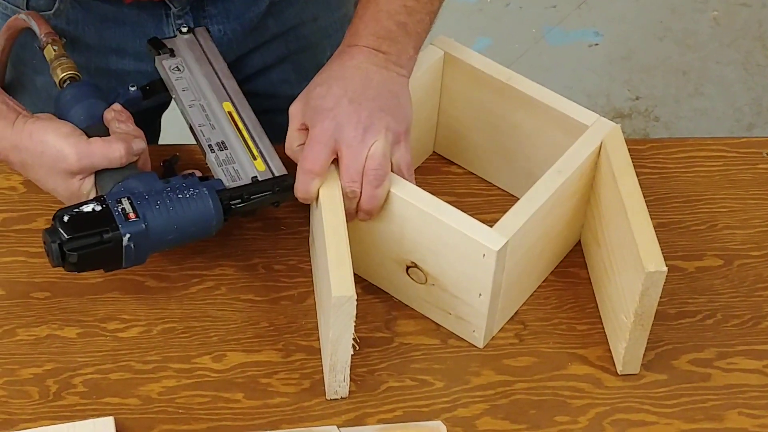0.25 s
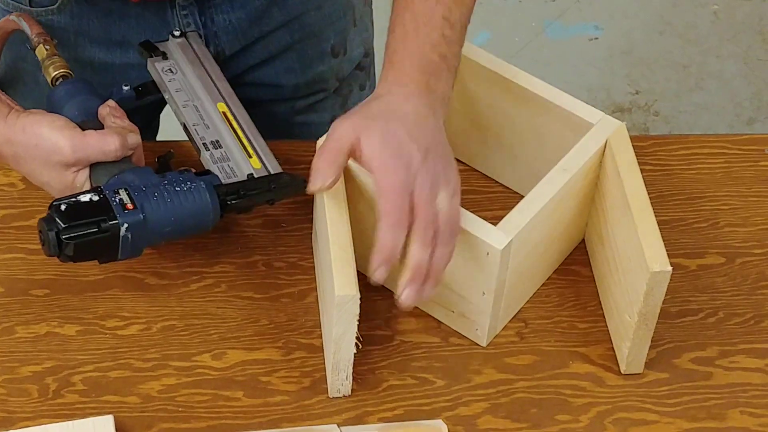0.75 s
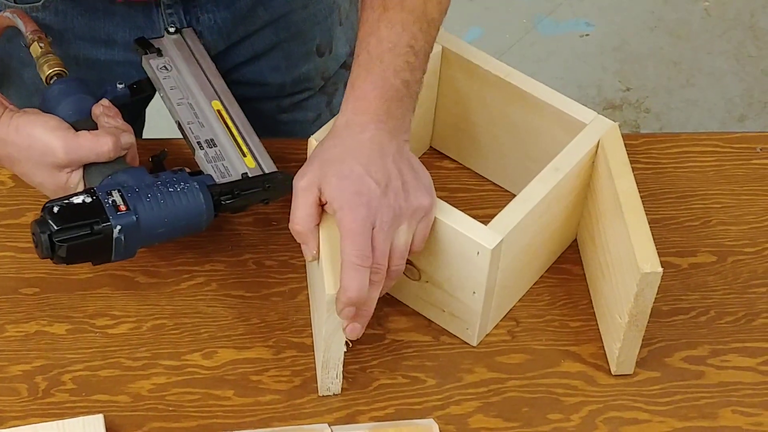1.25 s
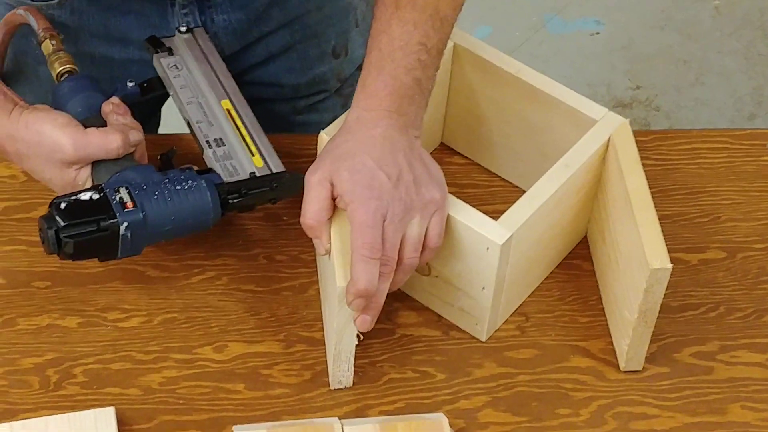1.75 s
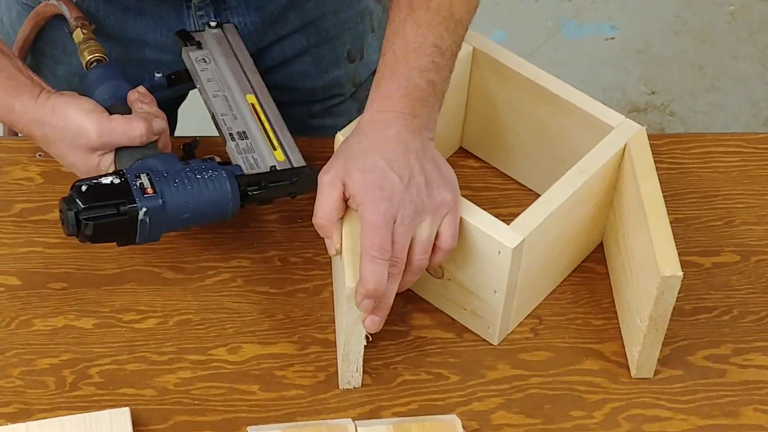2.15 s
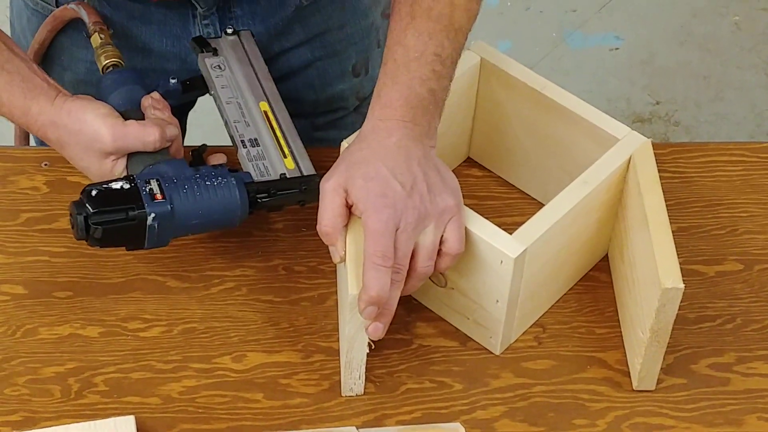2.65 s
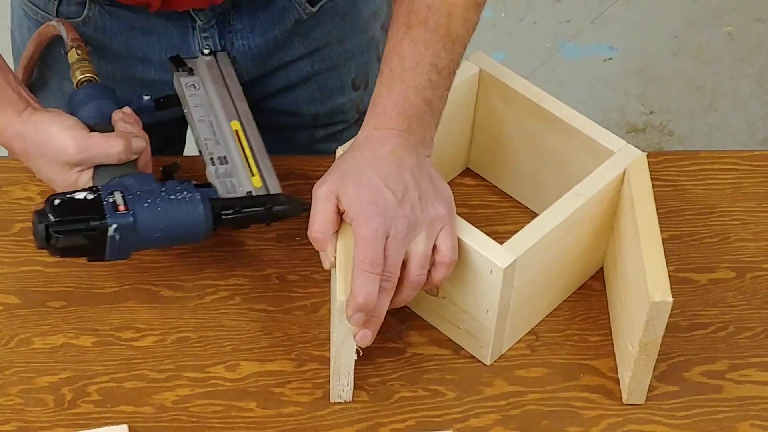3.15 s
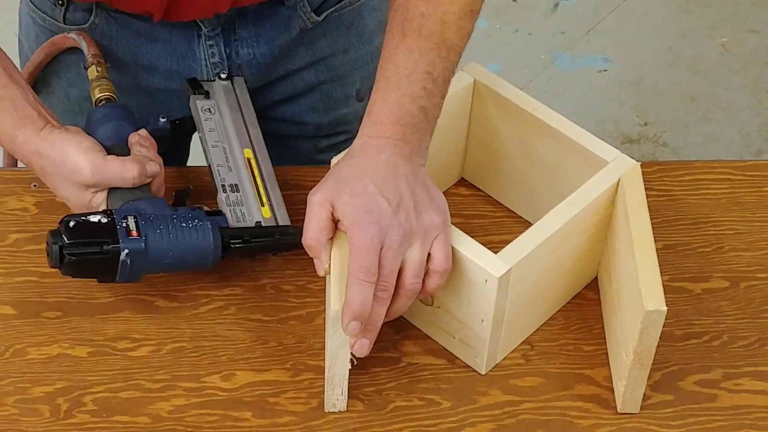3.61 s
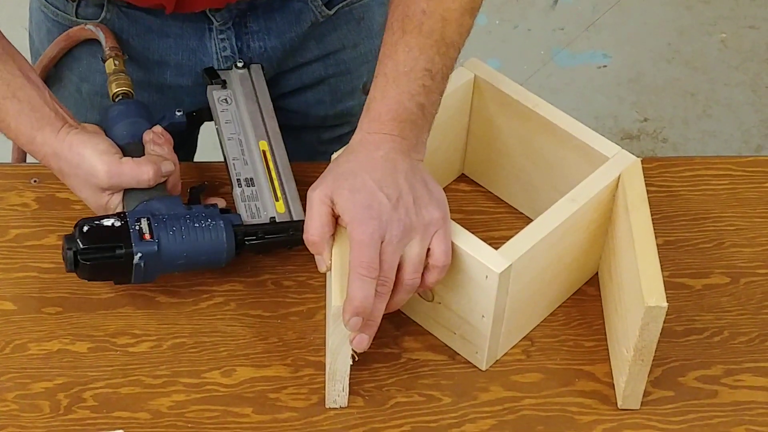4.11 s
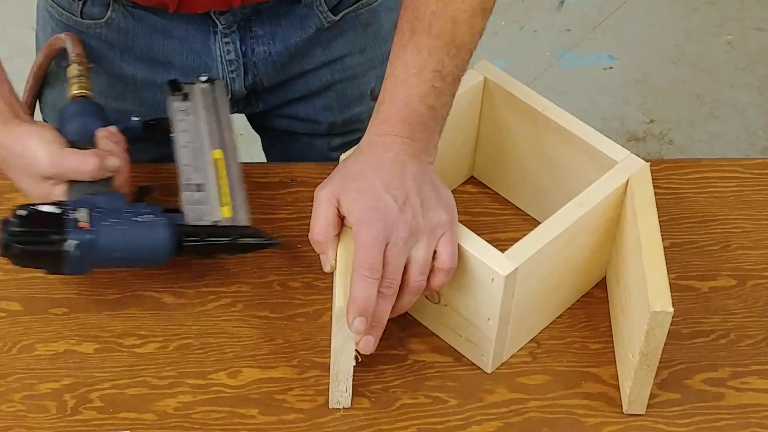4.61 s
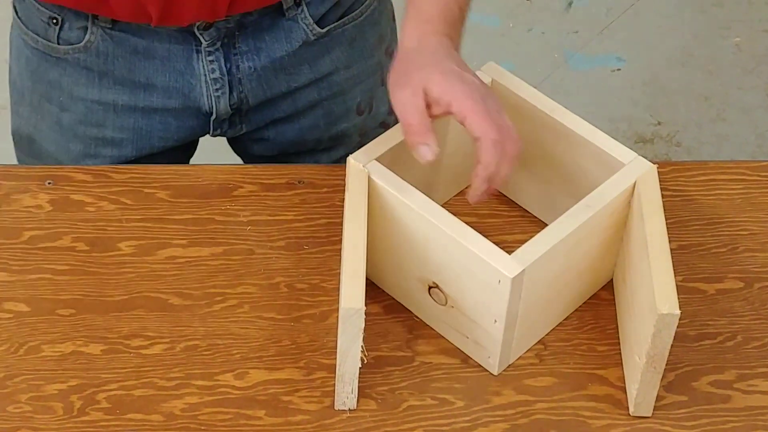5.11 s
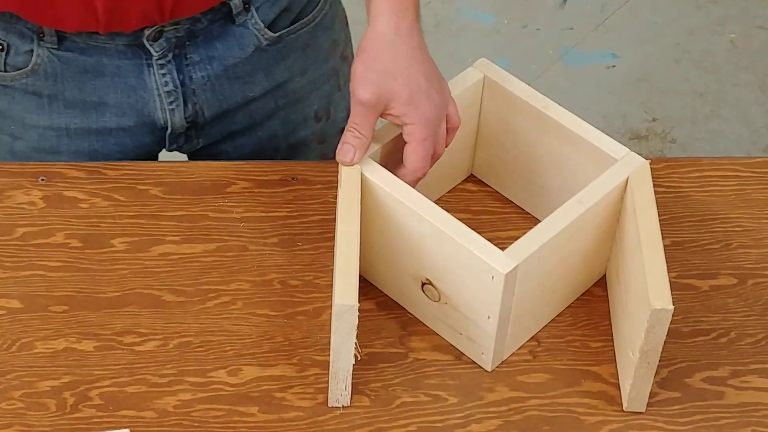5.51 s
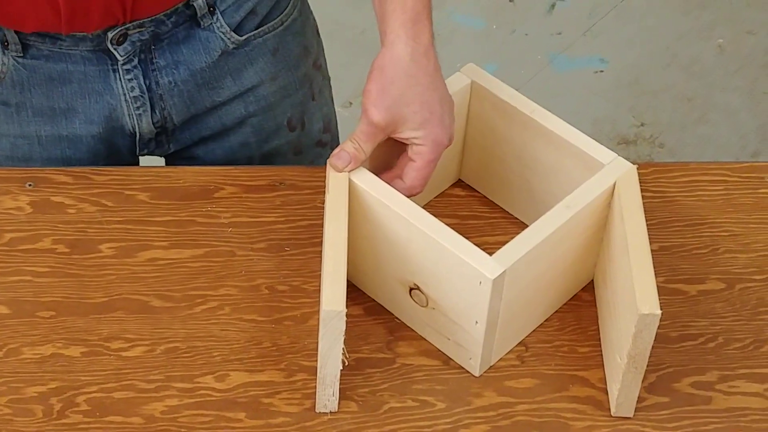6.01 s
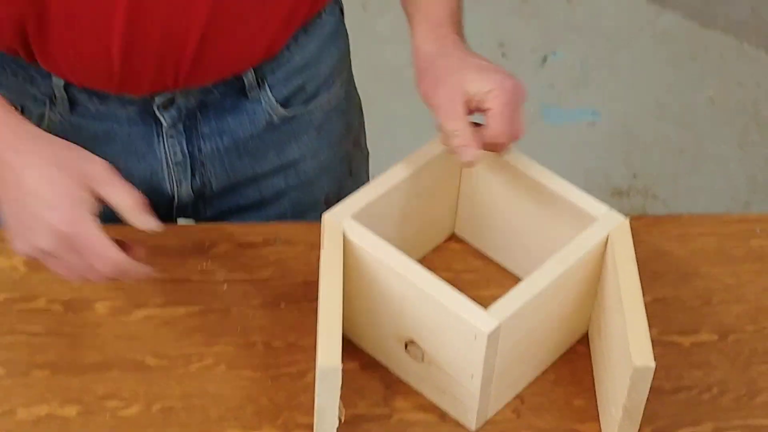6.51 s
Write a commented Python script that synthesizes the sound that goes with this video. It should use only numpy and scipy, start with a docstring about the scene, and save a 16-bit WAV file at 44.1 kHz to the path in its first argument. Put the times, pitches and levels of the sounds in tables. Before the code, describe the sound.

Close at a workbench in a reverberant workshop with a low rumble, fingers scuff and click on a small wooden box, with a few soft bumps. An air stapler fires two very loud, sharp double cracks about a second and a half apart, each with a bright spit of exhaust. Then the hand rubs the wood, hollow knocks sound as the box is tipped, and a sleeve swishes softly.

```python
"""A pneumatic stapler fires twice into a wooden box on a workbench, in a live workshop.
Each shot is gated noise for the air and decaying modes for the driver's blow, the piston's stop and its return.
Hands shift their grip in noise scuffs and clicks; knocks on the box ring its modes, and at last it is tipped.
A sleeve swishes past as swelling noise, over a low rumble; echoes and a decaying noise tail form the room.
A fast limiter squashes the peaks."""
import sys
import numpy as np
from scipy import signal
from scipy.fft import rfft, irfft, next_fast_len
from scipy.io import wavfile
from scipy.ndimage import uniform_filter1d, minimum_filter1d, map_coordinates

SR = 44100
rng = np.random.default_rng(int(sys.argv[2]) if len(sys.argv) > 2 else 0)


def persist_wave(psi):
    """Save psi, clipped to +-1, as 16-bit WAV."""
    counts = np.round(np.clip(psi, -1, 1) * 32767).astype(np.int16)
    wavfile.write(sys.argv[1], SR, np.atleast_2d(counts).T)


N = 298116

# Spectrum of the steady rumble: pitch_hz, relative_db
RUMBLE_SPECTRUM = [(20, -32.5), (45, -49), (62, -0.5), (82, 9), (105, 4.5), (170, -4.5), (300, -13),
                   (700, -28), (1500, -48)]
# Spectrum of the workshop's faint air noise: pitch_hz, relative_db
AIR_SPECTRUM = [(120, 0), (250, -6), (500, -15), (1000, -21), (2000, -25), (4200, -26), (6500, -33),
                (10000, -42), (16000, -44)]
# Decay of the room's tail: pitch_hz, t60_s
ROOM_DECAY = [(70, 0.27), (200, 0.48), (600, 0.75), (2000, 0.61), (5000, 0.46), (8500, 0.51), (12000, 0.44),
              (16000, 0.53)]
# Echoes of the walls: delay_s, relative_db
WALL_ECHOES = [(0.046, -13.5), (0.062, -10), (.084, -14)]
# An arm sweeps past the clothes: fastest_s, level_db, half_length_s (to 1/e)
SWISHES = [(6.205, -56.5, 0.092), (6.399, -36.5, 0.055)]
# Spectrum of the swishing cloth: pitch_hz, relative_db
CLOTH_SPECTRUM = [(300, -30), (1100, -18), (1500, -3), (2300, -3.5), (3600, 2.5), (6500, -4.5), (8800, -14),
                  (10400, -36), (12500, -17), (15500, -29)]
# Hands and clothes rub, one curve per stroke: time_s, relative_db
RUB_STROKES = [
    [(0.0, -59), (0.382, -62.5), (0.594, -50.5), (0.73, -69), (0.8, -92)],
    [(4.95, -50.5), (5.378, -75.5), (5.464, -57), (5.772, -64), (5.86, -61.5)],
]
# Spectrum of skin rubbing wood: pitch_hz, relative_db
SKIN_SPECTRUM = [(150, 2.5), (500, -3.5), (900, -0.5), (1700, 6), (2500, 5.5), (4200, 3), (6500, -7.5),
                 (8500, -4.5), (10400, -27), (12500, -4), (16000, -22)]
# Longer scuffs of fingers and of the tool's nose on wood: start_s, relative_db, length_s, pitch_hz
SCUFFS = [(0.411, -48, 0.094, 6800), (0.489, -54, 0.055, 1770), (1.063, -57, 0.091, 1890),
          (1.271, -54.5, 0.038, 1340), (1.639, -56, 0.053, 6200), (2.263, -44, 0.056, 3310),
          (3.788, -45, 0.036, 1635), (3.957, -50, 0.08, 1862), (5.161, -43.5, 0.26, 1640),
          (5.672, -45, 0.1, 2810)]
# The time in which the grip keeps shifting: start_s, end_s
GRIP = (.1, 2.3)
# Light clicks of fingers, nose piece and trigger: start_s, relative_db, pitch_hz
CLICKS = [(0.167, -35.5, 1080), (0.203, -34.5, 2100), (0.318, -45, 4170), (0.578, -32, 2410),
          (0.597, -24.5, 6060), (0.626, -22.5, 2700), (0.657, -19.5, 2680), (1.636, -34.5, 6040),
          (1.829, -43.5, 1120), (1.887, -47.5, 2040), (2.253, -40, 3450), (2.269, -35, 1122),
          (2.458, -46, 1088), (3.807, -27.5, 1077), (3.826, -38, 1680), (3.958, -37, 1680),
          (3.987, -30, 2240), (4.084, -31.5, 1057)]
# Wood meets wood or the tool's nose: start_s, relative_db, hardness_hz, tick_db
KNOCKS = [(0.038, -32.5, 1540, -34.5), (0.959, -20.5, 396, -47.5), (1.201, -24.5, 268, -51.5),
          (1.783, -42, 1490, -46.5), (2.286, -27, 800, -46), (2.457, -41.5, 1600, -53.5),
          (4.083, -31, 1920, -46), (5.164, -19, 2320, -36), (5.364, -10, 400, -27.5),
          (5.705, -27.5, 1250, -39.5), (5.905, -2, 860, -23.5)]
# Ringing modes of the box: pitch_hz, relative_db, t60_s
BOX_MODES = [(113, -11, .2), (160, -8, .12), (192, 2, .14), (215, -3, .1), (243, 2, .15), (305, -6, .1),
             (398, -3, .07), (465, -1, .1), (565, -9, .05), (725, -10, .04), (960, -8, .04),
             (1170, -10, .035), (1480, -8, .04), (2190, -13, .03)]
# Ringing modes of the bench under it: pitch_hz, relative_db, t60_s
BENCH_MODES = [(62, -3, .2), (81, 1, .2), (105, -8, .12)]
# Ringing modes of the stapler's body: pitch_hz, relative_db, t60_s
STEEL_MODES = [(1499, -10.5, 0.35), (1640, 4.5, 0.33), (2010, -1.5, 0.036), (2030, -4, 0.29),
               (2590, -6.5, 0.069), (3177, 3, 0.31), (4400, -10, 0.089), (4300, 14, 0.03), (4946, 4, .03),
               (6130, -2, 0.12), (7000, -28.5, .02)]
# Spectrum of the crack of steel on steel: pitch_hz, relative_db
CRACK_SPECTRUM = [(30, -35), (100, -19), (300, -8), (800, -19), (1500, 1.5), (2300, 3), (3200, 0),
                  (5400, 2.5), (6800, -8), (8200, -5), (10400, -21.5), (12500, -13), (15500, -13.5)]
# Spectrum of the spitting valve: pitch_hz, relative_db
SPIT_SPECTRUM = [(30, -39), (120, -18), (300, 2), (1000, -15), (3000, 2), (5000, -2.5), (6500, 4),
                 (8700, -0.5), (10400, -7), (12000, 1), (15500, 2.5)]
# Spectrum of the exhaust jet: pitch_hz, relative_db
JET_SPECTRUM = [(30, -39.5), (110, -11), (200, -1), (330, -5.5), (520, 7), (850, -0.5), (1900, 0),
                (3500, 5), (5200, 12), (7000, 5.5), (8500, 8.5), (10500, -1), (12000, 5.5), (15500, -2.5)]
# Shots: trigger_pulled_s, driver_stroke_s, trigger_held_s, spit_db, exhaust_db
SHOTS = [(2.866, .0157, .118, 3.5, 0), (4.3426, .0206, .0985, -7, 0.5)]

# background: the rumble, its drift, and the bench's shudder with each knock
RUMBLE_DB, RUMBLE_DRIFT_DB, WORKSHOP_DB = -50.5, 1.5, -61
SHUDDER_DB, SHUDDER_DB_PER_DB = -32.5, 0.4  # level under a 0 dB knock, and its change per dB of knock
SHUDDER_RISE_S, SHUDDER_S = 0.043, 0.076  # it builds as the box starts to move, then dies

# hands: rubbing offset, faint random scuffs, clicks, and the trigger just before the last shot
RUB_DB = 4.5
FIDGETS_PER_S, FIDGET_DB, FIDGET_S, FIDGET_HZ = 5, -62.5, 0.042, 1880  # central values of the random scuffs
CLICK_DB, CLICK_T60_S = -5.5, 0.041
TRIGGER_LEAD_S, TRIGGER_DB, TRIGGER_HZ = 0.028, -35, 7950

# knocks: the bench's thud, the soft contacts' jolt, and the box rocking back
THUD_DB, THUD_DB_PER_DB = -13, 0.67  # level under a 0 dB knock, and its change per dB of knock
JOLT_SOFT_HZ = 1310  # contacts softer than this shove the whole box
ROCK_S, ROCK_DB_PER_DB, ROCK_SHRINK = 0.052, 0.28, .55  # first gap at 0 dB, its growth, next gap over it
ROCK_LOSS_DB, ROCK_DULLS = 9, 0.37  # loss and hardness ratio per contact
TIP_S, TIP_DB = 5.825, -18  # the box is tipped over its edge and only the bench thuds

# every shot runs the same cycle: staple strike, bumper stop, valve release, exhaust, piston return
STRIKE_STEEL_DB, STRIKE_WOOD_DB = 6, 10.5
STOP_AFTER_S, STOP_STEEL_DB, STOP_WOOD_DB = .0045, 20, -9  # after the strike
RETURN_AFTER_S, RETURN_STEEL_DB, RETURN_WOOD_DB = .0325, 10.5, 14  # after the release
RELEASE_DB, RELEASE_S = 8.5, 0.036  # the valve spits as the trigger is let go
VENT_AFTER_S, VENT_HOLD_S, VENT_T60_S = .025, 0.075, 0.62  # after the release
FLUTTER_DB, FLUTTER_PER_S = 0.9, 90  # the exhaust jet is turbulent


def amp(db):
    """Amplitude gain is ten to the power of decibels over twenty."""
    return 10 ** (np.asarray(db) / 20)


def unit(x):
    """Division by the root mean square gives unit rms."""
    return x / np.sqrt(np.mean(x ** 2) + 1e-20)


def along(points, hz):
    """Interpolation on a log frequency axis joins (pitch_hz, value) points."""
    f, v = np.transpose(points)
    return np.interp(np.log(hz + 1), np.log(f + 1), v)


def clock():
    """Sampling divides one second into equal time steps."""
    return np.arange(SR) / SR


def add(track, s, sound):
    """Superposition adds a sound to a track, in place, from time s."""
    part = track[..., max(round(s * SR), 0):][..., :sound.shape[-1]]
    part += sound[..., :part.shape[-1]]


def filtered(x, response):
    """Linear filtering multiplies a spectrum by a response of frequency."""
    n = x.shape[-1]
    m = next_fast_len(n + 8192)
    hz = np.fft.rfftfreq(m, 1 / SR)
    return irfft(rfft(x, m) * response(hz), m)[..., :n]


def noise(spectrum, size, width):
    """Mid and side noises form coloured stereo of rms 1: width 0 is mono, 1 is unrelated above the bass."""
    def colour(hz):
        return amp(along(spectrum, hz)) * np.array([np.ones_like(hz), width * hz / (hz + 250)])

    mid, side = filtered(rng.standard_normal((2, size)), colour)
    return unit(np.array([mid + side, mid - side]))


def wobble(rate):
    """Spline interpolation of random knots, rate a second, gives a smooth random curve."""
    knots = rng.standard_normal(N // 100)
    return map_coordinates(knots, [np.arange(N) * rate / SR], mode="wrap")


def ring(modes, scatter_db, hard_hz=SR):
    """Modal synthesis sums damped sines at random strengths; a soft contact leaves the high ones quiet."""
    hz, db, t60 = np.transpose(modes)[:, :, None]
    gain = amp(db + scatter_db * rng.standard_normal(hz.shape))
    gain = gain / np.linalg.norm(gain)
    gain = gain / np.sqrt(1 + (hz / hard_hz) ** 6)
    sign = (-1) ** np.arange(len(hz))[:, None]
    decay = amp(-60 * clock() / t60)
    return np.sum(sign * gain * decay * np.sin(2 * np.pi * hz * clock()), axis=0)


def burst(spectrum, t60, width):
    """Exponential decay shapes noise that starts at once."""
    return noise(spectrum, SR, width) * amp(-60 * clock() / t60)


def contact(hz):
    """A small contact has a spectrum with one resonance."""
    return [(hz / 16, -18), (hz / 3, -14), (hz / 1.4, -8), (hz, 0),
            (hz * 1.4, -8), (hz * 2.5, -15), (hz * 6, -34)]


def background():
    """Stationary noise rumbles, swelling as knocks move the box, beside faint workshop air noise."""
    t = np.arange(N) / SR
    level = amp(RUMBLE_DB + RUMBLE_DRIFT_DB * wobble(7.4))
    for s, db, _, _ in KNOCKS:
        away = np.maximum((s - t) / SHUDDER_RISE_S, (t - s) / SHUDDER_S)
        level += amp(SHUDDER_DB + SHUDDER_DB_PER_DB * db) * np.exp(-away)
    rumble = level * noise(RUMBLE_SPECTRUM, N, width=0.097)
    return rumble + amp(WORKSHOP_DB) * noise(AIR_SPECTRUM, N, width=0.13)


def workshop(x, wet_db, swell):
    """Reverberation convolves a source with a decaying noise tail, narrower in the bass, plus dull wall echoes."""
    hz, t, z = signal.stft(rng.standard_normal((2, SR)), SR, nperseg=256)
    width = along([(200, 0.42), (400, .45), (800, 0.89), (2000, 1.094)], hz)[:, None]
    z = np.array([z[0] + width * z[1], z[0] - width * z[1]]) / np.sqrt(1 + width ** 2)
    build = 0.92 + 0.22 * np.minimum(t / swell, 1) ** 2  # complete after swell seconds
    decay = amp(-60 * t / along(ROOM_DECAY, hz)[:, None])
    tail = signal.istft(z * build * decay, SR, nperseg=256)[1]
    source = x.sum(axis=0, keepdims=True) / np.sqrt(2)
    out = signal.fftconvolve(source, tail / np.linalg.norm(tail[0]), axes=1)[:, :N]
    dull = filtered(x, lambda hz: 1 / (1 + 1j * hz / 1800))
    for delay, db in WALL_ECHOES:
        add(out, delay, amp(db) * dull)
    balance = [(100, 2.6), (8000, 9.3), (12000, 1)]  # pitch_hz, left_minus_right_db
    side = np.array([[.5], [-.5]])
    return amp(wet_db) * filtered(out, lambda hz: amp(side * along(balance, hz)))


def from_left(x, lead_s, treble_db):
    """Interaural time and level differences place a source left: earlier and louder in that channel."""
    side = np.array([[.5], [-.5]])
    tilt = [(100, 4.8), (500, 1), (2000, treble_db), (8000, treble_db), (14000, 1.2)]
    return filtered(x, lambda hz: amp(side * along(tilt, hz)) * np.exp(2j * np.pi * hz * lead_s * side))


def softened(x):
    """Wood and skin radiate little of the highest treble."""
    loss = [(8000, 0), (10400, -12), (12500, -7), (16000, -9)]  # pitch_hz, gain_db
    return filtered(x, lambda hz: amp(along(loss, hz)))


def swishes():
    """Cloth friction hisses with a bell-shaped level as an arm speeds up and slows down again."""
    t = np.arange(N) / SR
    level = sum(amp(db) * np.exp(-((t - s) / half) ** 2) for s, db, half in SWISHES)
    return level * noise(CLOTH_SPECTRUM, N, width=0.58)


def fidgets():
    """Random timing, one draw per equal slot, yields faint scuffs in rows like those of SCUFFS."""
    start, end = GRIP
    draws = rng.uniform(-1, 1, (int((end - start) * FIDGETS_PER_S), 4))
    rows = []
    for k, (when, loud, long, high) in enumerate(draws):
        s = start + (k + .5 + .5 * when) / FIDGETS_PER_S
        rows.append((s, FIDGET_DB + 3 * loud, FIDGET_S * 1.42 ** long, FIDGET_HZ * 2.8 ** high))
    return rows


def rubbing():
    """Stick-slip friction of skin, cloth and the tool's nose on wood is noise in uneven catches."""
    t, level = np.arange(N) / SR, np.zeros(N)
    for stroke in RUB_STROKES:
        s, db = np.transpose(stroke)
        fade = np.clip(np.minimum(t - s[0], s[-1] - t) / 0.1 + 1, 0, 1)
        level += amp(np.interp(t, s, db)) * fade
    out = amp(RUB_DB) * level * noise(SKIN_SPECTRUM, N, width=0.73)
    for s, db, length, hz in SCUFFS + fidgets():
        speed = np.sqrt(np.abs(np.sin(np.pi * np.minimum(clock() / length, 1))))
        add(out, s, amp(db) * speed * noise(contact(hz), SR, width=0.93))
    catches = unit(amp(3 * wobble(170) + 1.5 * wobble(25)))
    return catches * out


def clicks():
    """Brief impacts of fingers, nose piece and trigger excite decaying noise with one resonance."""
    out = np.zeros((2, N))
    trigger = (SHOTS[-1][0] - TRIGGER_LEAD_S, TRIGGER_DB, TRIGGER_HZ)
    for s, db, hz in list(CLICKS) + [trigger]:
        add(out, s, amp(db + CLICK_DB) * burst(contact(hz), t60=CLICK_T60_S, width=0.56))
    return out


def thud():
    """The bench's low modes boom briefly under the box."""
    return ring(BENCH_MODES, scatter_db=3)


def push(hz, t60):
    """A damped oscillation jolts the whole box for a few cycles."""
    return amp(-60 * clock() / t60) * np.sin(2 * np.pi * hz * clock())


def wood(hard_hz, grain_db):
    """Low box modes ring separately; the many weak ones overlap into a short noise clatter."""
    edge = max(hard_hz, 260)
    dense = [(40, -35), (120, -12), (200, 1), (250, 1),
             (edge, -4), (edge * 1.8, -15), (edge * 3.5, -38), (SR, -90)]
    squeeze = 1 - np.exp(-clock() * edge)  # a softer contact builds up more slowly
    modes = ring(BOX_MODES, scatter_db=1, hard_hz=hard_hz)
    return squeeze * (modes + amp(grain_db) * burst(dense, t60=.15, width=.4))


def knocks():
    """Each impact loses energy: the bench thuds and the box rocks back ever faster, softer and duller."""
    out = np.zeros((2, N))
    tick_spectrum = [(500, 5), (1500, -0.5), (6000, -9), (10000, -39.5), (16000, -27.5)]
    for s, db, hard_hz, tick_db in KNOCKS:
        tick = burst(tick_spectrum, t60=0.071, width=0.094)
        add(out, s, amp(THUD_DB + THUD_DB_PER_DB * db) * thud() + amp(tick_db) * tick)
        softness = 1 / (1 + (hard_hz / JOLT_SOFT_HZ) ** 2)
        add(out, s, amp(db) * softness * push(hz=163.3, t60=0.092))
        gap = ROCK_S * amp(ROCK_DB_PER_DB * db)
        for k in range(3):
            add(out, s, amp(db - ROCK_LOSS_DB * k) * wood(hard_hz * ROCK_DULLS ** k, grain_db=-8))
            s += gap * ROCK_SHRINK ** k
    add(out, TIP_S, amp(TIP_DB) * thud())
    return out


def air_blasts():
    """Turbulent flow makes noise: air spits on the stroke and release, then the cylinder vents."""
    out, t = np.zeros((2, N)), clock()
    for s, stroke, held, spit_db, exhaust_db in SHOTS:
        for start, db, length in [(s, spit_db, stroke), (s + held, RELEASE_DB, RELEASE_S)]:
            gate = np.minimum(t / .002, 1) * amp(-60 * np.maximum(t - length, 0) / 0.033)
            add(out, start, amp(db) * gate * noise(SPIT_SPECTRUM, SR, width=1.0))
        pressure = np.minimum(t / 0.0016, 1) * amp(-60 * np.maximum(t - VENT_HOLD_S, 0) / VENT_T60_S)
        jet = noise(JET_SPECTRUM, SR, width=0.87) * amp(FLUTTER_DB * wobble(FLUTTER_PER_S)[:SR])
        roar = filtered(jet, lambda hz: 1 / (1 + (hz / 3500) ** 2))
        hiss = jet - roar
        vent = pressure * roar + pressure ** 1.9 * hiss  # the hiss fades before the roar
        add(out, s + held + VENT_AFTER_S, amp(exhaust_db) * vent)
    return out


def blows():
    """Impact excites modes: staple strike, piston stop and return each ring the steel and the box."""
    out = np.zeros((2, N))
    for fired, stroke, held, _, _ in SHOTS:
        cycle = [(stroke, STRIKE_STEEL_DB, STRIKE_WOOD_DB),
                 (stroke + STOP_AFTER_S, STOP_STEEL_DB, STOP_WOOD_DB),
                 (held + RETURN_AFTER_S, RETURN_STEEL_DB, RETURN_WOOD_DB)]
        for delay, steel_db, wood_db in cycle:
            body = amp(-17) * ring(STEEL_MODES, scatter_db=1.5)
            crack = burst(CRACK_SPECTRUM, t60=0.044, width=0.4)
            add(out, fired + delay, amp(steel_db) * (crack + body))
            pressed = amp(-60 * clock() / 0.03)  # hand and tool press on the box and damp it
            add(out, fired + delay, amp(wood_db) * pressed * wood(hard_hz=1600, grain_db=1.0))
    return out


def scene():
    """Direct and reverberant sound superpose: the shots fill the room, the handling stays close and left."""
    shots, air, cloth = blows(), air_blasts(), swishes()
    box, hands = softened(knocks()), softened(clicks() + rubbing())
    direct = from_left(shots + air, lead_s=.00007, treble_db=6.5)
    direct += from_left(box + hands, lead_s=.00016, treble_db=9.5)
    direct += from_left(cloth, lead_s=.00038, treble_db=5.5)
    room = workshop(shots, wet_db=1, swell=0.024)
    room += workshop(air, wet_db=-6, swell=0.025)
    room += workshop(box, wet_db=-7.5, swell=0.066)
    room += workshop(hands + cloth, wet_db=-9.0, swell=0.0072)
    return direct + room + background() * amp([[2.0], [-2.0]])  # the background leans left


def limiter(x, ceiling_db, release_db, hold):
    """Peak limiting lowers each channel's gain around peaks; it recovers by release_db a second."""
    size = max(int(hold * SR), 2)
    need_db = np.minimum(ceiling_db - 20 * np.log10(np.abs(x) + 1e-9), 0)
    ramp = release_db * np.arange(N) / SR
    gain_db = np.minimum.accumulate(minimum_filter1d(need_db, size) - ramp, axis=1) + ramp
    return x * amp(uniform_filter1d(gain_db, size))


def record(dry):
    """Band limiting and dynamics: the microphone's bass cut, a fast limiter and a steep treble cut."""
    bass_cut = signal.butter(3, 50, "highpass", fs=SR, output="sos")
    lean = signal.sosfilt(bass_cut, dry)
    held = limiter(lean, ceiling_db=1.0, release_db=321.5, hold=.002)
    return filtered(held, lambda hz: 1 / (1 + (hz / 15900) ** 160))


dry = scene()
out = record(dry)
persist_wave(out)
```